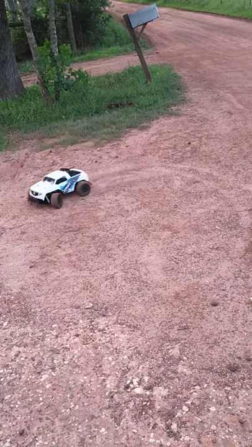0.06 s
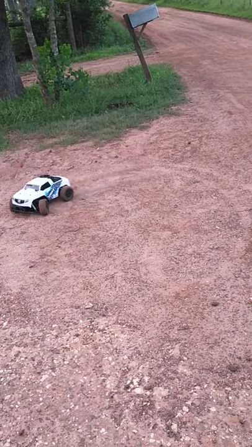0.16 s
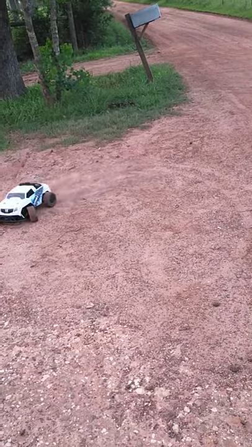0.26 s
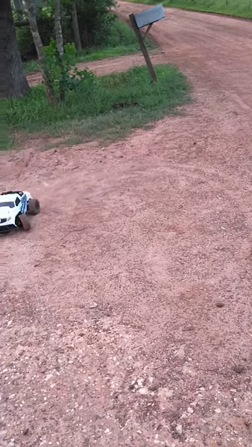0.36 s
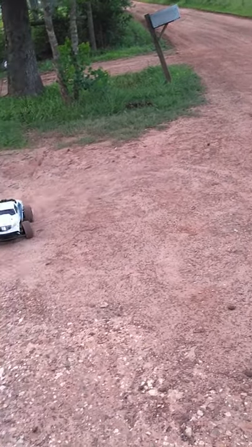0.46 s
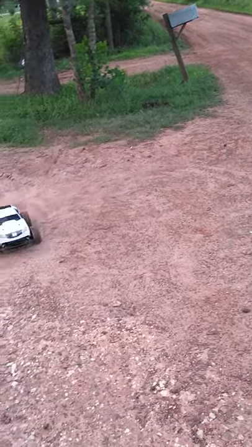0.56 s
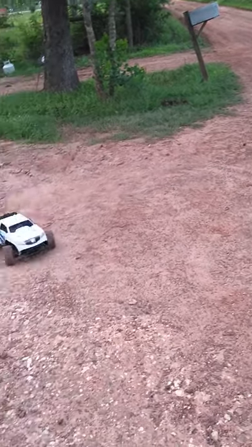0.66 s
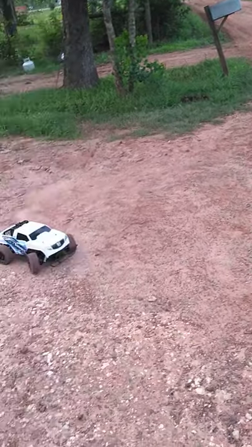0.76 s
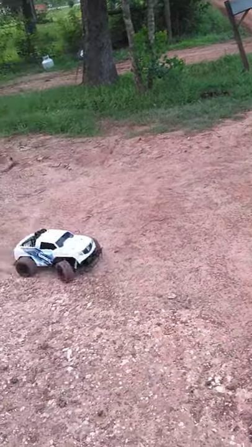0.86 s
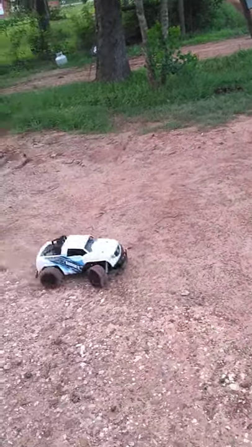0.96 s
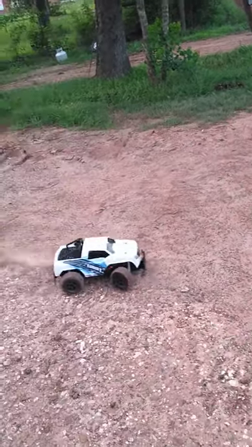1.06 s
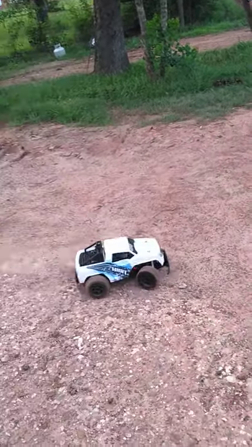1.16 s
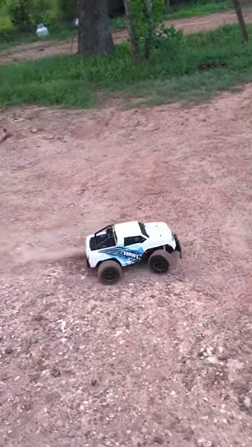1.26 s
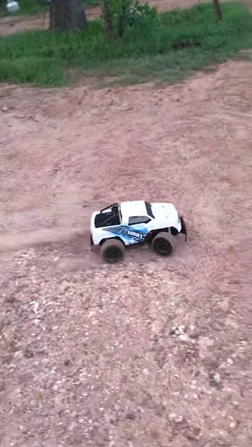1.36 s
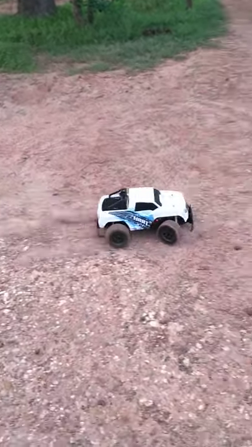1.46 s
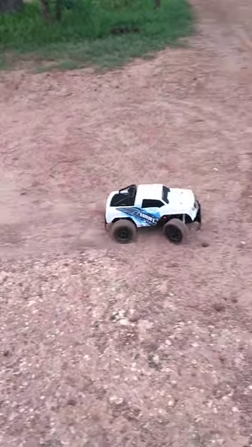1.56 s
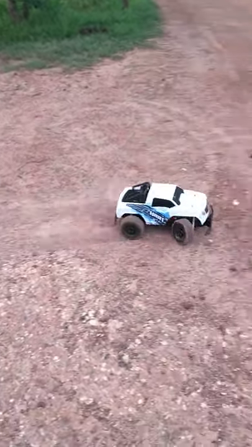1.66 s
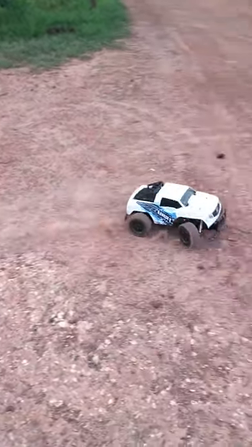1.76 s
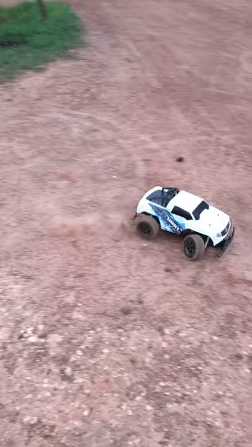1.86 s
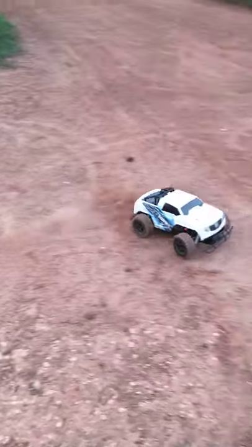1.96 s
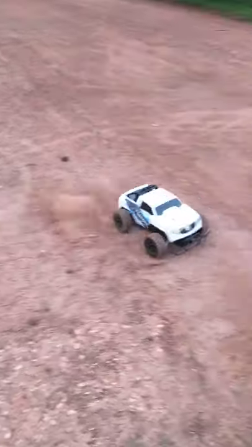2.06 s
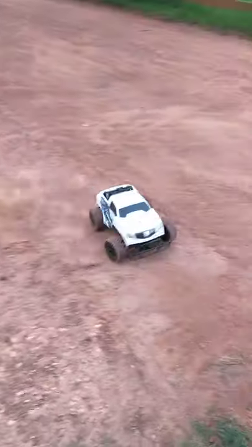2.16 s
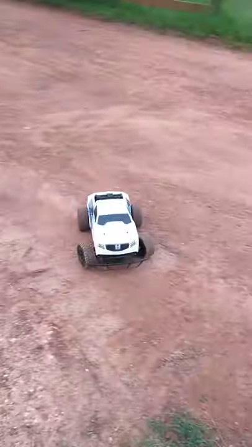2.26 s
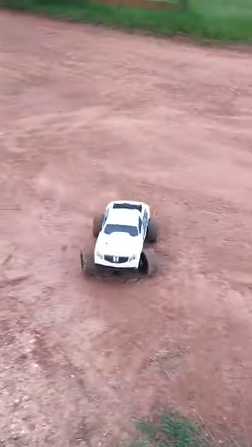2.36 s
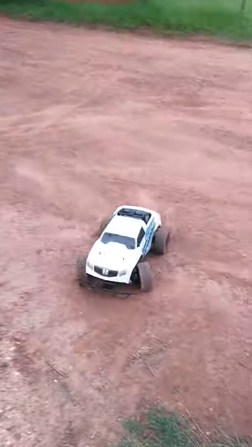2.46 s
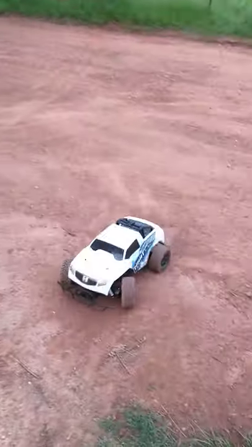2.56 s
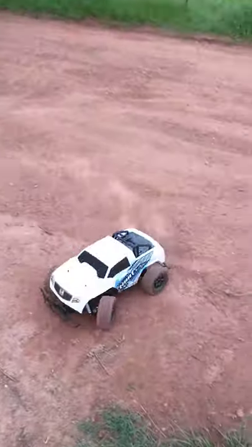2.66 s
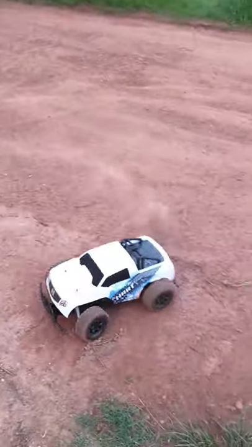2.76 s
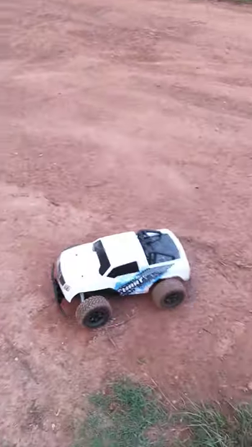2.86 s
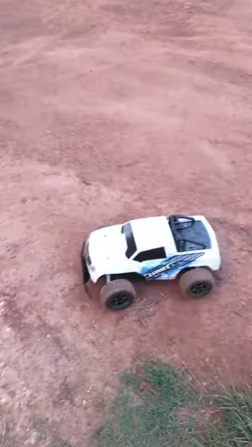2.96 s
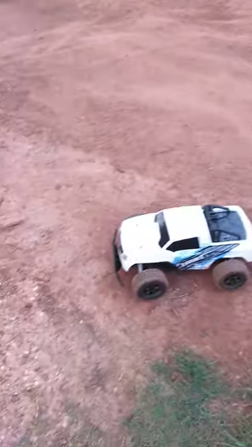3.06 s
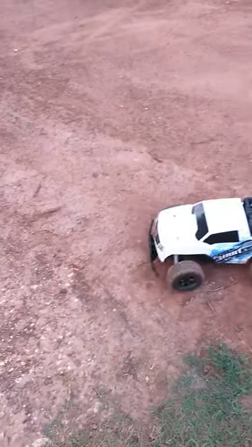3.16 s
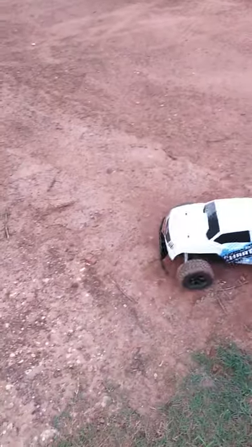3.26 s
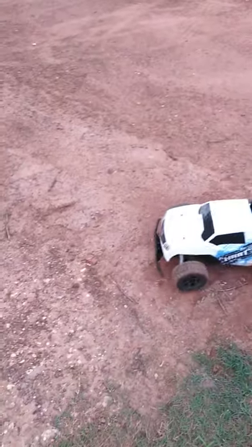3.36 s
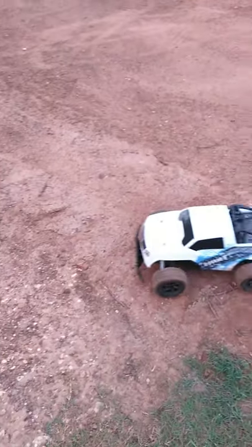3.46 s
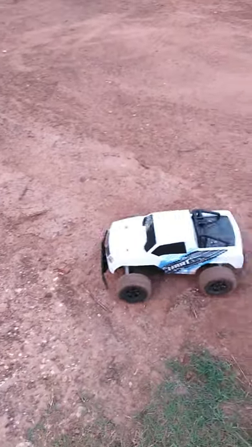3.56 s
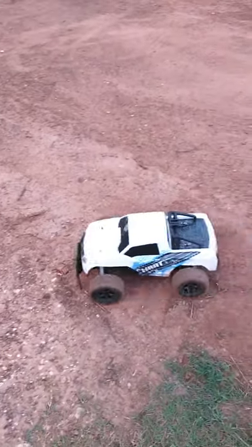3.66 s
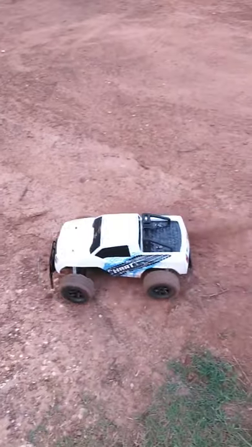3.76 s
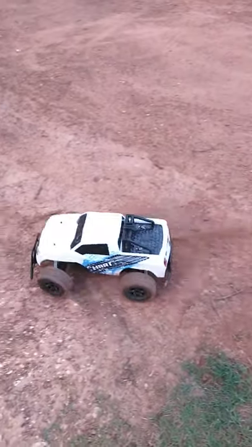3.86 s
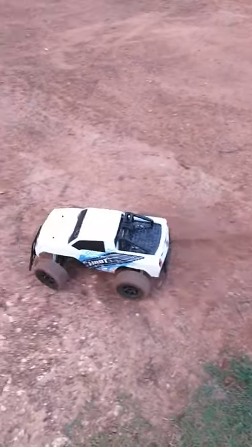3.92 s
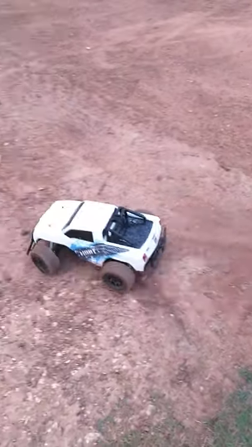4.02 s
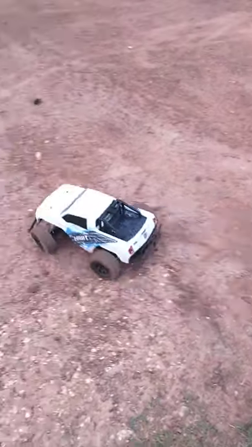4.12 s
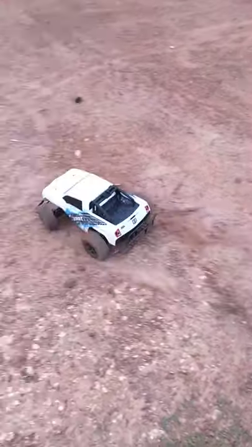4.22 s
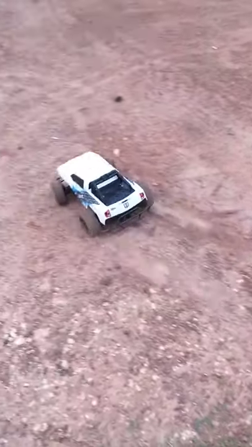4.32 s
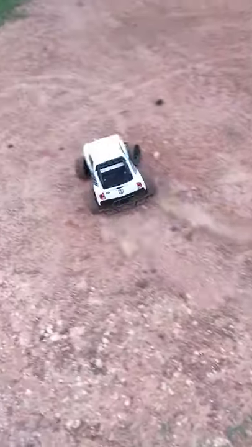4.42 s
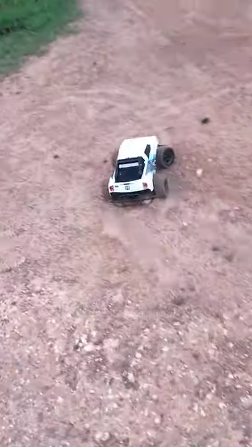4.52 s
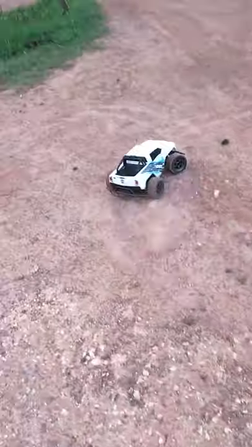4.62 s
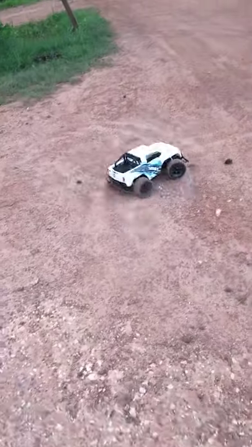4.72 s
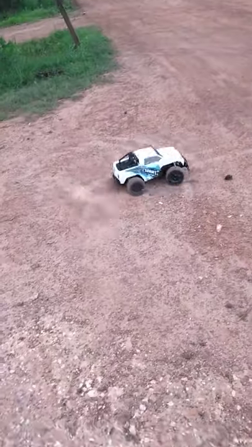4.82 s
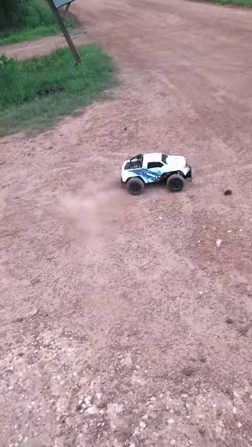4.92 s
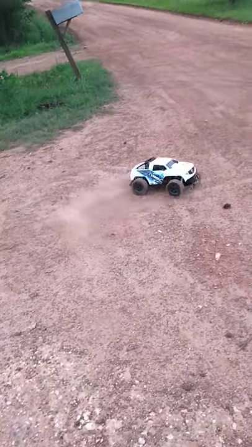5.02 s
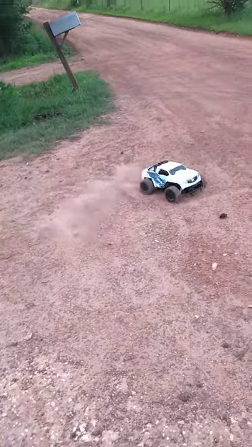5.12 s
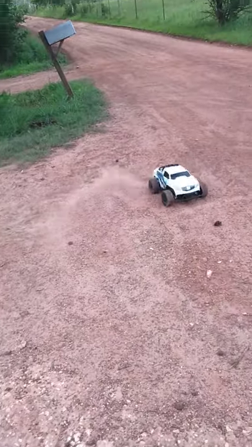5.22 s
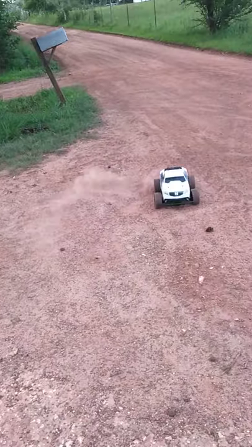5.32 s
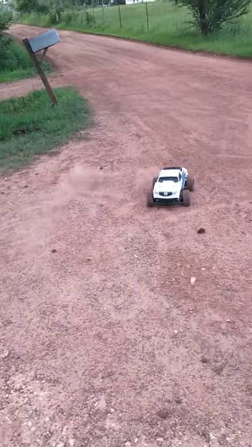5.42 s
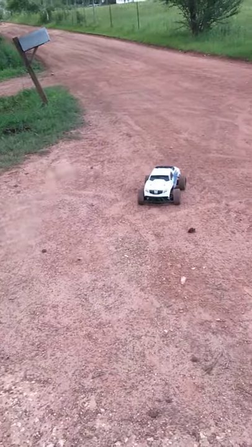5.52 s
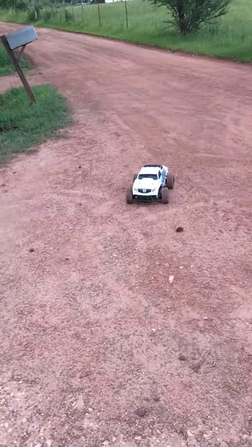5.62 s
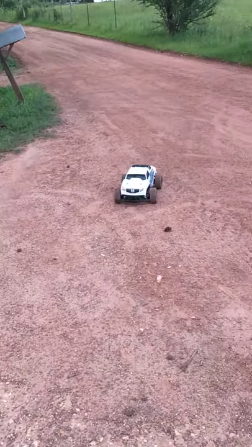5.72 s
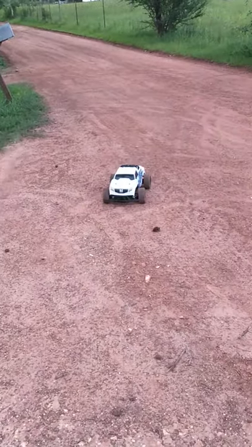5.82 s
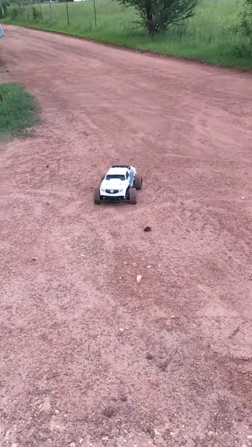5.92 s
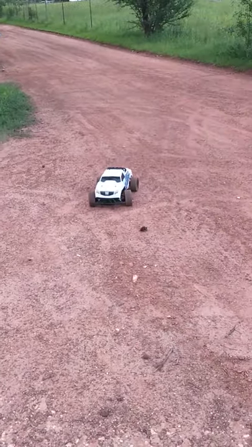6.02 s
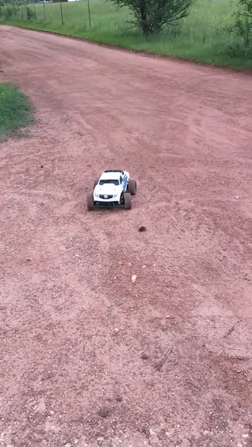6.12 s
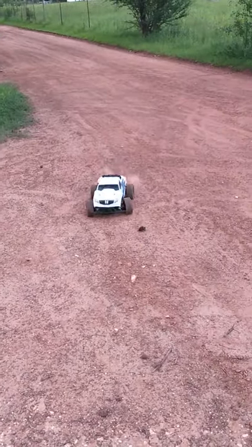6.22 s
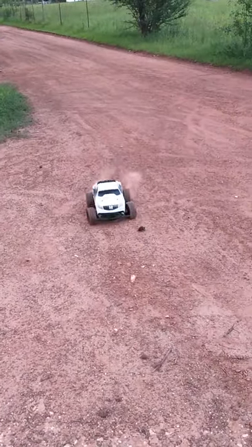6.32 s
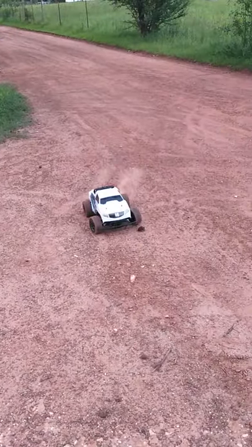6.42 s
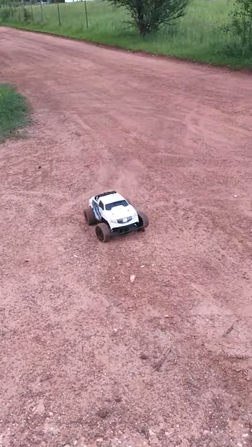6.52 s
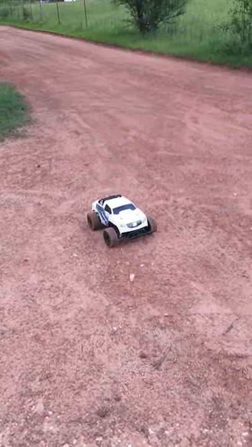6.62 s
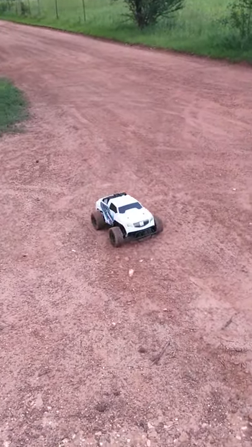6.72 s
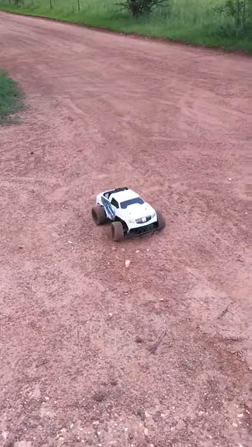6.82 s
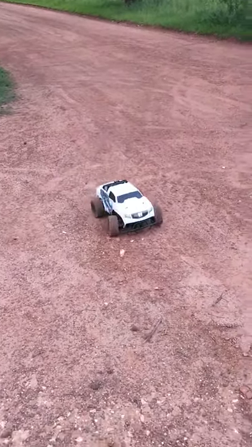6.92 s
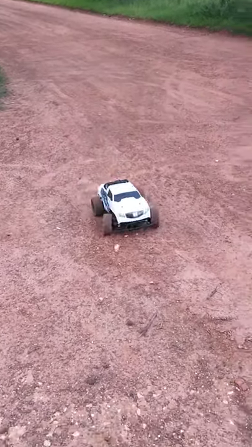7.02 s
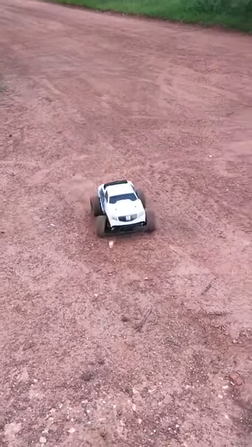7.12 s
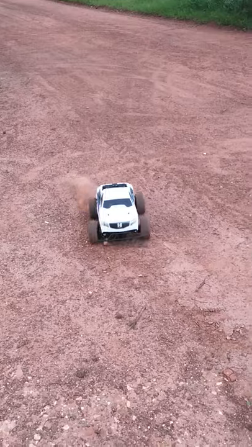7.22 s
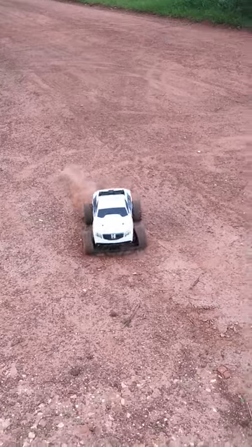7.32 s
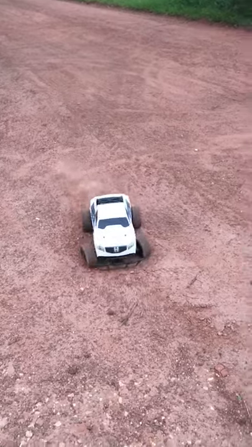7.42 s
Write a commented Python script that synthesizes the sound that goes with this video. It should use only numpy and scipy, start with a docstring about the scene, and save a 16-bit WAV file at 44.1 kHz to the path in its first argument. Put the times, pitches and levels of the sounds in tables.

```python
"""Outdoors on loose dirt and gravel, a toy truck with a hollow plastic shell spins its tyres, stopping twice.
Random cracks of crushed grit ring the shell and chassis; stones knock; the grip throbs with each wheel turn.
A straining motor is kicked noise, the worn gears a smeared tone with its octave.
Wind puffs of low noise and single thumps hit two microphone ports; a faint hiss lies below."""
import sys
import numpy as np
from scipy import signal
from scipy.fft import rfft, irfft
from scipy.io import wavfile

SR = 44100
rng = np.random.default_rng(int(sys.argv[2]) if len(sys.argv) > 2 else 0)


def transcribe(u):
    """Save the signal u as a 16-bit wav file named by the first command-line argument.

    u: samples, shape (n,) or (channels, n), limited to [-1, 1]; the rate is SR.
    q: integer samples, one column per channel.
    """
    v = np.clip(np.atleast_2d(u).T, -1, 1)
    q = np.round(v * 32767).astype(np.int16)
    wavfile.write(sys.argv[1], SR, q)


N = 329868


def amp(db):
    """Decibels to an amplitude factor."""
    return 10 ** (np.asarray(db) / 20)


def rms_one(x):
    """Scales to an rms of 1."""
    return x / np.sqrt(np.mean(x ** 2) + 1e-20)


def in_time(rows):
    """Draws each column as straight lines over the scene."""
    s, *columns = np.transpose(rows)
    return [np.interp(np.arange(N) / SR, s, c) for c in columns]


def at_hz(points):
    """Values on the FFT grid, straight lines on a log-frequency axis."""
    hz, value = np.transpose(points)
    return np.interp(np.log(np.fft.rfftfreq(N, 1 / SR) + 1), np.log(hz), value)


def drift(per_s):
    """Slow chance with spread 1: white noise through two equal low-pass poles at per_s Hz."""
    r = np.exp(-2 * np.pi * per_s / SR)
    white = rng.standard_normal(N + SR)
    # the first second lets the filter settle
    return rms_one(signal.lfilter([1], [1, -2 * r, r * r], white)[SR:])


def colour(x, spectrum):
    """Causal (minimum-phase) filter with the given spectrum; white rms 1 stays rms 1."""
    cepstrum = irfft(np.log(amp(np.maximum(at_hz(spectrum), -150))), N)
    # folding the cepstrum forward makes the response causal
    cepstrum[1:N // 2] *= 2
    cepstrum[N // 2 + 1:] = 0
    response = np.exp(rfft(cepstrum))
    level = rms_one(np.abs(response))
    return irfft(rfft(x) * level * np.exp(1j * np.angle(response)), N)


def resonance(x, hz, width_hz):
    """One two-pole resonance; the width sets how fast it dies."""
    r = np.exp(-np.pi * width_hz / SR)
    poles = [1, -2 * r * np.cos(2 * np.pi * hz / SR), r * r]
    return signal.lfilter([(1 - r * r) / 2, 0, (r * r - 1) / 2], poles, x)


def modes(x, table):
    """Parallel resonances with alternating signs."""
    return sum((-1) ** k * amp(db) * resonance(x, hz, width) for k, (hz, width, db) in enumerate(table))


def ring(s, hz, t60, rise_s):
    """A damped swing that starts at s, swells in and loses 60 dB in t60 seconds."""
    age = np.maximum(np.arange(N) / SR - s, 0)
    swing = amp(-60 * age / t60) * np.sin(2 * np.pi * hz * age)
    return swing * (1 - np.exp(-age / rise_s))


def shelf(x, hz, kind, extra_db):
    """Raises or lowers one end of the spectrum over time."""
    end = signal.sosfilt(signal.butter(2, hz, kind, fs=SR, output="sos"), x)
    return x + (amp(extra_db) - 1) * end


def grains(per_s, spread_db, clump_db, clumps_per_s):
    """Two unrelated streams of random cracks of uneven size that come in shared clumps; rms 1."""
    sizes = amp(spread_db * np.minimum(rng.exponential(1, (2, N)), 5)) * rng.standard_normal((2, N))
    born = rng.random((2, N)) < per_s / SR
    return rms_one(sizes * born * amp(clump_db * drift(clumps_per_s)))


# Colour of the outdoor hiss. Each row: frequency in Hz, relative density in dB per Hz.
AIR = [(71, -37), (120, -44.5), (183, -11.5), (336, -43), (1020, -35.5), (1870, -55.5), (3500, -55),
       (4300, -43), (5200, -50), (9050, -52), (15000, -72)]
AIR_DB = -69.5   # rms ahead of the ports


def air():
    """A faint outdoor hiss: steady coloured noise, unrelated in the two streams."""
    return amp(AIR_DB) * colour(rng.standard_normal((2, N)), AIR)


# Colour of the wind's turbulence. Each row: frequency in Hz, relative density in dB per Hz.
GUST = [(20, -50), (35, -19.5), (58, -1), (90, -5.5), (125, -8.5), (165, -13.5), (260, -48.5), (900, -120)]
# Gusts on the left port, then on the right.
# Each row: start of full strength in seconds, hold in seconds, level in dB before the lumps.
GUSTS = [
    [(.33, 0.074, -53), (.464, 0.094, -31.5), (.986, 0.11, -39.5), (2.242, 0.0096, -33),
     (2.541, 0.17, -23.5), (3.365, 0.021, -44.5), (3.49, 0.035, -26), (3.66, 0.27, -24.5),
     (4.003, 0.1, -33), (4.24, 0.13, -26), (5.223, 0.013, -36.5), (5.65, 0.066, -40), (5.815, 0.022, -49),
     (6.0, 0.15, -48), (6.413, 0.12, -46.5)],
    [(.608, 0.033, -40), (1.015, .02, -43), (1.3, 0.13, -51.5), (1.906, 0.12, -45.5), (2.149, 0.23, -38),
     (2.542, 0.085, -31.5), (2.913, 0.012, -38.5), (3.33, 0.38, -33), (3.69, 0.43, -23),
     (4.178, .186, -32.5), (4.479, 0.014, -40), (6.42, .1, -57)],
]
GUST_RISE_DB_PER_S, GUST_FALL_DB_PER_S, CALM_DB = 796, 242.5, -63


def gusts(rows):
    """Each gust rises fast, holds and dies away over a calm breeze."""
    t = np.arange(N) / SR
    strength = amp(CALM_DB)
    for s, hold_s, db in rows:
        rise_db = GUST_RISE_DB_PER_S * (t - s)
        fall_db = GUST_FALL_DB_PER_S * (s + hold_s - t)
        strength = strength + amp(db + np.minimum(0, np.minimum(rise_db, fall_db)))
    return strength


def wind():
    """Lumpy low turbulence, partly shared and opposite in sign at the two ports."""
    white = rng.standard_normal((2, N))
    white[1] += -.4 * white[0]
    lumps = amp(3.2 * np.array([drift(21), drift(18)]))
    puffs = rms_one(colour(lumps * white, GUST))
    return np.array([gusts(rows) for rows in GUSTS]) * puffs


# Single puffs of wind that thump one port.
# Each row: start in seconds, frequency in Hz, 60 dB decay in seconds, left and right level in dB before the swell.
THUMPS = [(3.294, 62, 0.13, -49, -12), (5.696, 56.3, 0.088, -17.5, -44), (5.814, 50.3, 0.14, -27, -50)]


def thumps():
    """Each puff is one low damped swing, far stronger at one port."""
    return sum(amp([[left_db], [right_db]]) * ring(s, hz, t60, rise_s=0.0053)
               for s, hz, t60, left_db, right_db in THUMPS)


# The motor straining before the wheels turn. Each row: time in seconds, rms level in dB ahead of the ports.
STRAIN = [(3.11, -87), (3.125, -50), (3.16, -55.5), (3.27, -55.5), (3.4, -42.5), (3.46, -51.5), (3.52, -90)]
# Gearbox resonances, passed twice. Each row: frequency in Hz, width in Hz and gain in dB of a single pass.
STRAIN_MODES = [(290, 150, -1), (458, 184, 2.5)]
STRAIN_KICKS_PER_S, STRAIN_UNEVEN = 77.0, .8   # commutator kicks; noise rms against the kicks' rms


def strain():
    """A stalled motor shakes the gearbox with steady but uneven kicks."""
    turn = np.cumsum(STRAIN_KICKS_PER_S * (1 + .02 * drift(10))) / SR
    kicks = rms_one(np.diff(np.floor(turn), prepend=0))
    kicks = kicks + STRAIN_UNEVEN * rng.standard_normal(N)
    shaken = modes(modes(kicks, STRAIN_MODES), STRAIN_MODES)
    return amp(in_time(STRAIN)[0]) * rms_one(shaken)


# Gears take up their slack, the chassis settles, a loose part ticks.
# Each row: start in seconds, frequency in Hz, 60 dB decay in seconds, rise in seconds, level in dB before the rise.
SLACK = [(3.117, 480, 0.034, 0.0036, -25.5), (3.117, 1380, 0.02, .002, -46), (5.385, 196, 0.07, .008, -33),
         (5.796, 1980, 0.04, .02, -48)]
# Rough gear mesh whine, before slips.
# Each row: time in seconds, mesh frequency in Hz, level in dB over the gripping scrub.
WHINE = [(0, 2300, -20), (1.2, 2400, -19), (1.6, 1790, -13), (1.93, 2150, -14), (2.33, 1750, -16),
         (2.5, 1884, -25), (3.3, 1410, -7), (3.75, 1650, -6), (4.15, 1760, -9), (4.45, 2400, -12),
         (4.65, 2330, -15), (5.0, 2330, -16), (5.6, 2050, -26), (6.85, 1917, -27), (6.98, 1900, -17),
         (7.08, 2120, -11), (7.2, 1950, -10), (7.48, 2000, -25)]
FREE_SPIN_PER_DB, SPIN_LAG_S = .018, .015   # the mesh speeds up by this share per dB of lost bite, a little late
MESH_BLUR_HZ = 125   # drift rate that smears the mesh tone
WHINE_SLIPS = .05   # share of the scrub depth in the whine


def smeared_tone(turn, blur_hz):
    """A tone blurred into narrow noise by drifting sine and cosine parts."""
    return drift(blur_hz) * np.sin(turn) + drift(blur_hz) * np.cos(turn)


def gears(grip_db, slip_db):
    """Short rings, then worn teeth; a slipping wheel spins free, so the mesh rises and stands out."""
    rings = sum(amp(db) * ring(s, hz, t60, rise_s) for s, hz, t60, rise_s, db in SLACK)
    mesh_hz, whine_db = in_time(WHINE)
    lag = np.exp(-1 / (SPIN_LAG_S * SR))
    spin = 1 - FREE_SPIN_PER_DB * signal.lfilter([1 - lag], [1, -lag], slip_db)
    turn = 2 * np.pi * np.cumsum(mesh_hz * spin) / SR
    tone = smeared_tone(turn, MESH_BLUR_HZ)
    octave = smeared_tone(2 * turn, 2 * MESH_BLUR_HZ)
    level_db = grip_db + whine_db + WHINE_SLIPS * slip_db + 2.5 * drift(30)
    # the octave grows with speed
    octave_db = np.minimum(.015 * (mesh_hz * spin - 2300), 4)
    return rings + amp(level_db) * (tone + amp(octave_db) * octave)


# Stones and jolts on the chassis.
# Each row: start in seconds, strength in dB before each layer's offset, extra share of the boom in dB.
KNOCKS = [(0.492, -29, 2), (0.609, -20, 4.5), (0.744, -14, -21), (0.774, -22, 10), (1.018, -19, 5),
          (1.145, -11, -8), (1.292, -22, 10), (1.36, -17, 2.5), (1.961, -12.5, -26), (2.065, -16.5, -14),
          (2.178, -22, -17), (2.238, -17.5, -10), (2.362, -33, -18.5), (2.512, -18.5, 5.5),
          (2.547, -10, -13), (2.578, -13.5, -24), (2.602, -31, -7), (2.849, -52, -10), (2.873, -51.5, 15),
          (3.369, -36.5, -20), (3.476, -28.5, -5), (3.523, -34, -13), (3.563, -37.5, 1), (3.752, -11, -14),
          (3.801, -12, -21), (3.845, -6, -3.5), (3.994, -18, 1), (4.054, -20, 0), (4.528, -7, -5.5),
          (4.587, -11, -4.5), (4.63, -19.5, 12), (4.731, -9, -15), (4.851, -18, 0.5), (4.948, -11.5, 1.5),
          (5.093, -12.5, -24.5), (5.116, -8.5, -9.5), (5.237, -21.5, -14.5), (5.888, -35.5, -6),
          (6.445, -27.5, 6.5), (6.656, -26.5, -7), (6.699, -30, -20), (6.789, -26.5, -5), (6.863, -30, -8),
          (7.002, -12, -1), (7.336, -25, -5), (7.421, -31, -18)]


def knocks(offset_db, boom_share=0):
    """Each stone is a noise crunch that swells and dies within milliseconds, in the shared stream only."""
    out, age = np.zeros((2, N)), np.arange(1200) / SR
    envelope = np.exp(-age / .006) * (1 - np.exp(-age / .001))
    crunches = rng.standard_normal((len(KNOCKS), 1200)) * envelope
    for (s, strength_db, share_db), crunch in zip(KNOCKS, crunches):
        at = int(s * SR)
        out[0, at:at + 1200] += amp(strength_db + boom_share * share_db + offset_db) * crunch
    return out


# Air and wall resonances. Each row: frequency in Hz, width in Hz, gain in dB before the band filter.
SHELL = [(199.7, 12.3, -6), (251, 115, -5.5), (288.2, 36.8, 5), (342.4, 32.8, 1.5), (428, 133, -5.5)]


def shell(x):
    """The hollow body's resonances, kept dark below and above."""
    return signal.sosfilt(signal.butter(2, [165, 470], "band", fs=SR, output="sos"), modes(x, SHELL))


def shell_boom(boom_db):
    """Crushed grit and stones boom in the hollow shell."""
    cracks = grains(900, spread_db=1.5, clump_db=1.5, clumps_per_s=22.6)
    return amp(boom_db) * rms_one(shell(cracks)) + shell(knocks(21.5, boom_share=1))


# Colour of the chassis. Each row: frequency in Hz, relative density in dB per Hz.
CHASSIS = [(280, -36.5), (480, -11), (590, -5.5), (700, -1), (780, 0.5), (901, 2.5), (1010, 1.5),
           (1130, -7), (1210, 0), (1400, 1), (3300, -13.5), (4290, -20.5), (7260, -120)]


def chassis_scrub(scrub_db):
    """Dense cracks and stones shake the chassis in the middle of the spectrum."""
    cracks = grains(3000, spread_db=-1.0, clump_db=1.0, clumps_per_s=31.0)
    return colour(amp(scrub_db) * cracks + knocks(-11.5), CHASSIS)


# Colour of the flying grit. Each row: frequency in Hz, relative density in dB per Hz.
GRIT = [(1650, -12.5), (2800, -7), (3280, -5.5), (3800, -1.5), (5000, -0.5), (6440, -11), (7830, -16.5),
        (9940, -31.5), (11100, -29), (13400, -36.5), (14200, -32), (14900, -54.5), (15800, -46.5)]


def grit_spray(grit_db):
    """Very dense bright cracks, over a fainter, sparser layer of more uneven ones that comes in clumps."""
    cracks = grains(6000, spread_db=0.0, clump_db=1.5, clumps_per_s=12.5)
    sparse_cracks = grains(200, spread_db=2.5, clump_db=3.0, clumps_per_s=8)
    spray = colour(amp(grit_db) * cracks + knocks(-14), GRIT)
    return spray + colour(amp(grit_db - 16) * sparse_cracks, GRIT)


def patchy(x, depth_db, per_s):
    """Stones of changing size: each half octave swells and sinks on its own."""
    spectrum, hz, out = rfft(x), np.fft.rfftfreq(N, 1 / SR) + 1, 0
    place = np.clip(2 * np.log2(hz / 500), 0, 9)
    for k in range(10):
        band = irfft(spectrum * np.maximum(1 - np.abs(place - k), 0), N)
        out = out + amp(depth_db * drift(per_s)) * band
    return out


# About once a wheel turn the tyres lose their bite, then grip again.
# Each row: least bite in seconds, fade in seconds, scrub change in dB, grit change in dB.
SLIPS = [(0.098, 0.011, -3.0, -2.5), (0.222, 0.035, -6.5, -2.5), (0.342, 0.024, -4.5, -2),
         (0.441, 0.031, -8, -7), (0.594, 0.11, -6.5, -4.5), (0.716, 0.089, -6, -4),
         (0.829, 0.039, -7.5, -4.5), (0.935, 0.067, -5, -4), (1.111, 0.075, -11, -4), (1.221, 0.011, -6, 1),
         (1.344, 0.039, -9.5, -7), (1.505, 0.055, -15, -10.5), (1.611, 0.04, -7.5, -13),
         (1.713, 0.034, -12, -10), (1.81, 0.024, -6, -0.5), (1.941, 0.098, -20.5, -5.5),
         (2.043, 0.034, -10, -13), (2.159, 0.03, -7, -10), (2.342, 0.055, -26, -19.5),
         (2.488, 0.063, -8.5, -23), (2.539, 0.0098, -4, -5.5), (3.784, 0.011, -10, -5),
         (3.819, 0.01, -8.5, -2), (3.93, 0.03, -4.5, -5.5), (4.041, 0.035, -5.5, -9.5),
         (4.284, 0.015, -4.5, -6), (4.458, 0.042, -5, -2.5), (4.565, 0.013, -6.5, -4.5),
         (4.717, 0.047, -5, -7), (4.816, 0.053, -5, -5.5), (5.07, 0.047, -12, -5.5),
         (5.209, 0.032, -8, -5.5), (6.42, 0.033, -5, -6.5), (6.627, 0.13, -17.5, -14),
         (6.752, 0.043, -13, -6), (6.838, 0.028, -10.5, -8), (6.983, 0.069, -13.5, -15),
         (7.1, 0.05, -12, -9), (7.221, 0.028, -10, -7)]
REGRIP_S = 0.015   # recovery


def bite_db():
    """Each slip fades the grip at its own pace; grip always returns quickly. Rows: scrub, grit."""
    t = np.arange(0, N, 32) / SR   # a coarse grid is enough
    dips = 0
    for s, fade_s, *db in SLIPS:
        pace_s = np.where(t < s, fade_s, REGRIP_S)
        dips = dips + np.outer(db, np.exp(-((t - s) / pace_s) ** 2))
    return [np.interp(np.arange(N) / SR, t, dip) for dip in dips]


# How hard the tyres work the ground while they grip.
# Each row: time in seconds, then drive in dB before slips for shell boom, chassis scrub and grit spray.
LOAD = [(0.0, -28.5, -35, -39), (0.55, -29, -33.5, -36.5), (0.78, -26.5, -29.5, -34.5),
        (1.3, -24, -28, -34.5), (1.6, -35.5, -39.5, -43.5), (1.85, -30.5, -35.5, -43.5),
        (2.15, -36.5, -35.5, -30.5), (2.62, -27, -34.5, -37), (2.72, -41.5, -54.5, -59),
        (2.93, -62, -64, -66), (3.0, -79, -81, -71.5), (3.34, -56, -68, -71), (3.38, -50, -56.5, -67),
        (3.465, -59, -52.5, -59), (3.485, -37.5, -42.5, -55), (3.75, -24, -27.5, -34.0),
        (4.45, -27, -32.5, -34), (4.65, -23.5, -26, -29), (5.0, -25, -29.5, -33.5), (5.15, -26, -26, -32),
        (5.27, -28.5, -36, -38.5), (5.34, -40.5, -44, -47), (5.41, -52.5, -62, -65.5),
        (5.5, -67, -75.5, -72), (5.83, -88, -86, -77.5), (5.88, -54, -58.5, -77), (5.905, -39.5, -43, -52),
        (6.0, -32, -37.5, -43), (6.2, -27.5, -36, -40), (6.4, -33.5, -39.5, -43),
        (6.7, -37.5, -45.5, -56.5), (6.85, -36.5, -44, -54.5), (6.9, -27.5, -32, -29.5),
        (7.28, -26.5, -33, -38.5), (7.48, -45, -58.5, -68.5)]
# The low mids and the treble of the gravel swell and sink as the truck turns.
# Each row: time in seconds, low-mid lift in dB, treble lift in dB.
ENDS = [(0, 5.5, 3.5), (1.3, 3, 5.5), (1.5, 0, 9), (1.9, -14, 10), (2.3, -30, 8), (2.7, 4, 2.5),
        (3.3, 4, 2), (3.4, 1, 16.5), (3.7, 6, 2), (4.2, 1, 3.5), (4.6, 1, 5), (5.1, 6.5, 4), (5.4, 1.5, 8),
        (5.9, 7, 1.5), (6.4, 3, 0), (6.9, 5, -0.5), (7.48, 5.5, 10.5)]
BOOM_SLIPS = 0.92   # share of the scrub depth felt by the shell
CRUNCH_DB, CRUNCHES_PER_S = .7, 45   # spread and drift rate: tread blocks bite all sizes of stone together


def truck():
    """Tyres on gravel, gears and motor, as two streams: what both ports share, and what differs."""
    boom_db, grip_db, grit_db = in_time(LOAD)
    slip_db, grit_slip_db = bite_db()
    low_mid_db, treble_db = in_time(ENDS)
    boom = shell_boom(boom_db + BOOM_SLIPS * slip_db)
    scrub = shelf(chassis_scrub(grip_db + slip_db), 1090, "low", low_mid_db)
    grit = shelf(grit_spray(grit_db + grit_slip_db), 6440, "high", treble_db)
    crunch = amp(CRUNCH_DB * drift(CRUNCHES_PER_S))
    out = boom + patchy((scrub + grit) * crunch, depth_db=2.4, per_s=20.0)
    out[0] += gears(grip_db, slip_db) + strain()
    return out


# Colour of the ports. Each row: frequency in Hz, left minus right in dB.
LEFT_OVER_RIGHT = [(60, -6.5), (99, 7), (160, 0.5), (270, 1), (450, 7), (740, -10), (1220, 6.5), (2010, 2),
                   (3330, 1.5), (5500, 3.5), (9080, 11), (15000, 15)]
# Likeness of the ports. Each row: frequency in Hz, left-right likeness from 0 to 1.
LIKENESS = [(200, 1), (480, 0.94), (700, 0.43), (1300, 0.91), (2400, 0.85), (4400, 0.9), (8000, 0.075),
            (15000, 0.17)]
# Phase between the ports. Each row: frequency in Hz, lead of the left in radians.
LEFT_LEAD = [(300, 0.21), (600, -1.6), (800, 0.94), (1030, 1.32), (1300, 0.39), (2150, 0.62), (3360, 1.12)]


def ports(streams):
    """Each port hears the shared and the differing stream through its own colour and phase."""
    shared, apart = rfft(streams)
    alike = np.clip(at_hz(LIKENESS), 0, 1)
    tilt = amp(at_hz(LEFT_OVER_RIGHT) / 2)
    turn = tilt * np.exp(.5j * at_hz(LEFT_LEAD))
    mid = np.sqrt((1 + alike) / 2) * shared
    side = np.sqrt((1 - alike) / 2) * apart
    even = (tilt + 1 / tilt) / 2   # keeps the mean gain of the two ports at 1
    return amp(1.09) * irfft(np.array([(mid + side) * turn, (mid - side) / turn]) / even, N)


def scene():
    """Truck and hiss pass the ports' colour; the wind acts on each port directly."""
    return ports(truck() + air()) + wind() + thumps()


CUTOFF_HZ = 15988


def record(dry):
    """The top is cut steeply."""
    return signal.sosfilt(signal.cheby2(24, 70, CUTOFF_HZ, fs=SR, output="sos"), dry)


dry = scene()
out = record(dry)
transcribe(out)
```